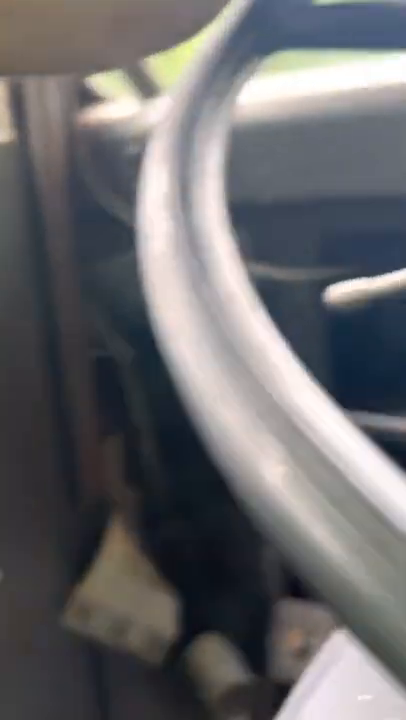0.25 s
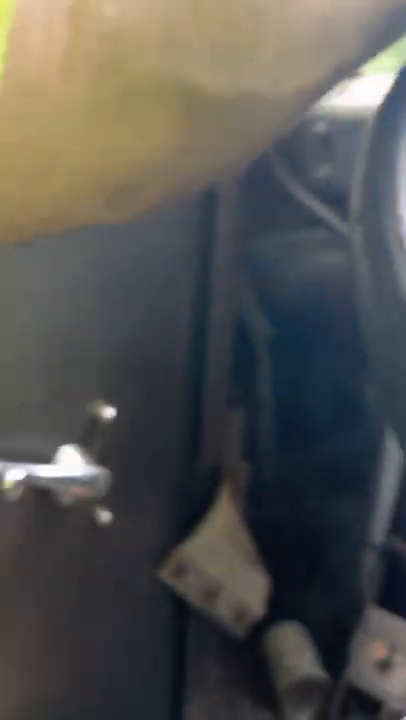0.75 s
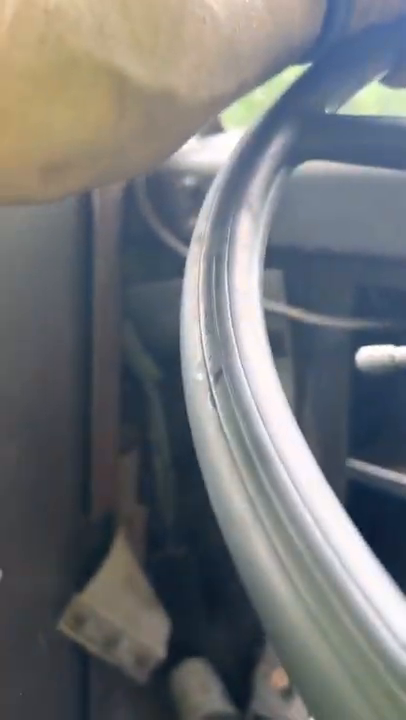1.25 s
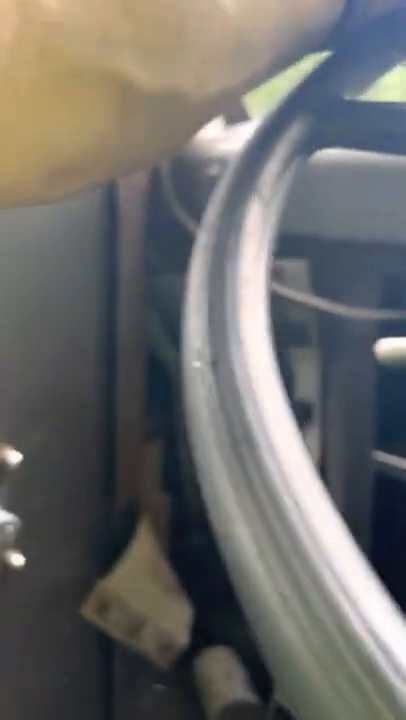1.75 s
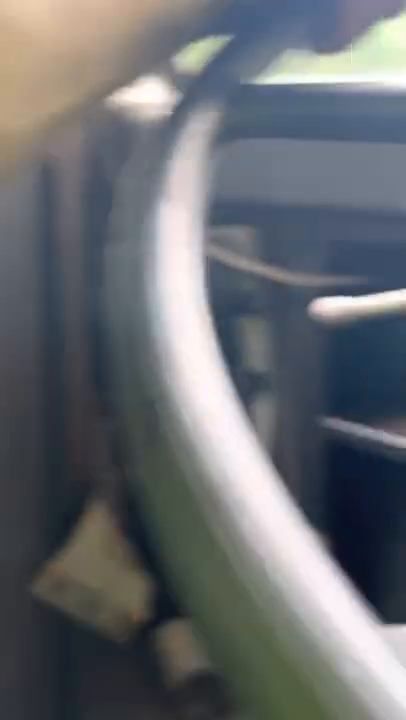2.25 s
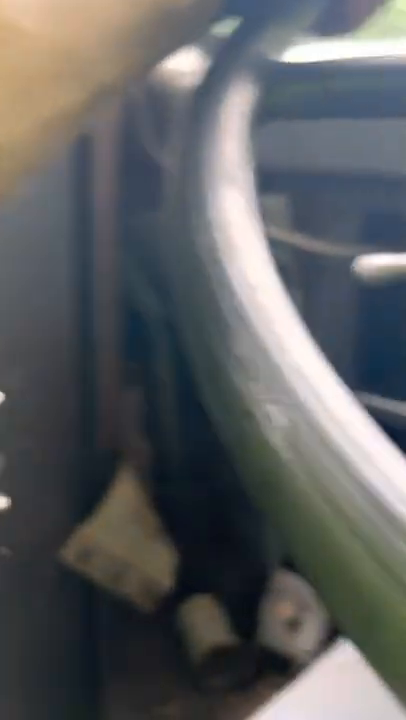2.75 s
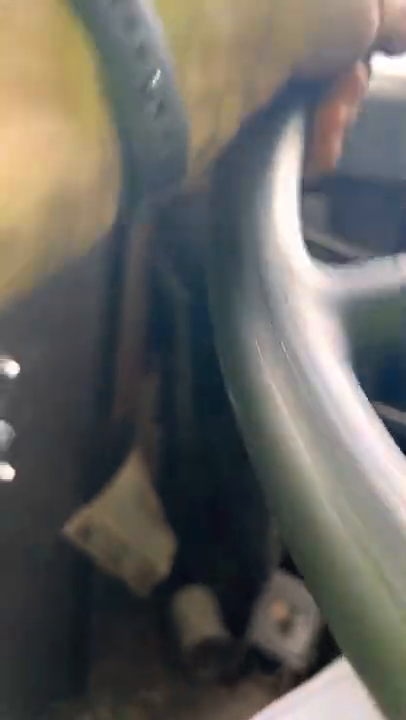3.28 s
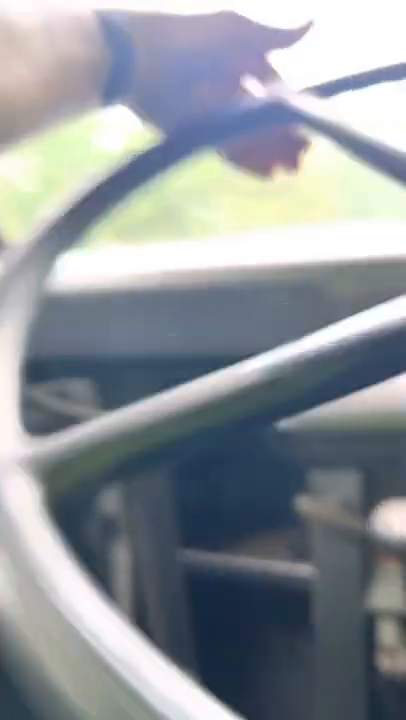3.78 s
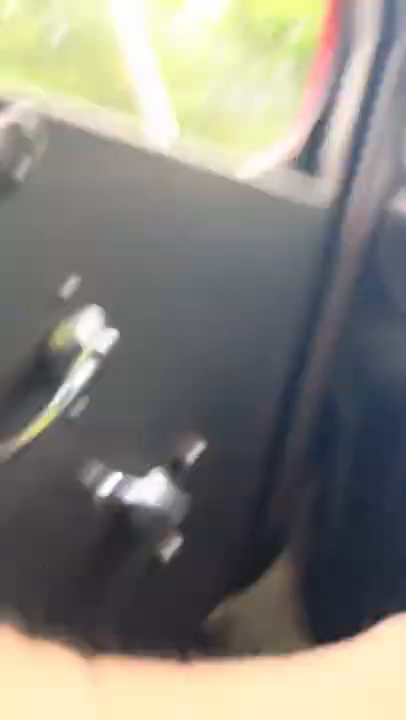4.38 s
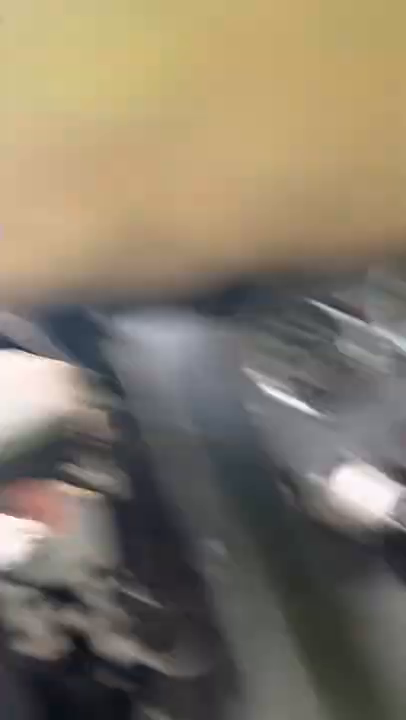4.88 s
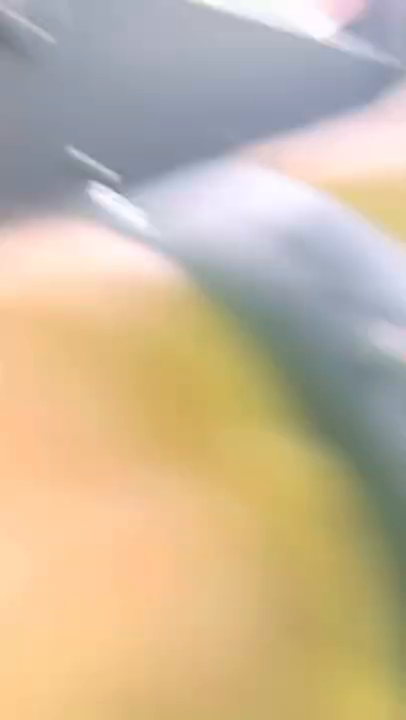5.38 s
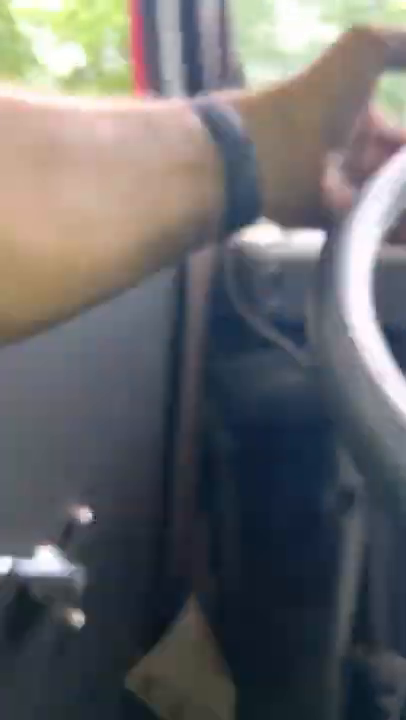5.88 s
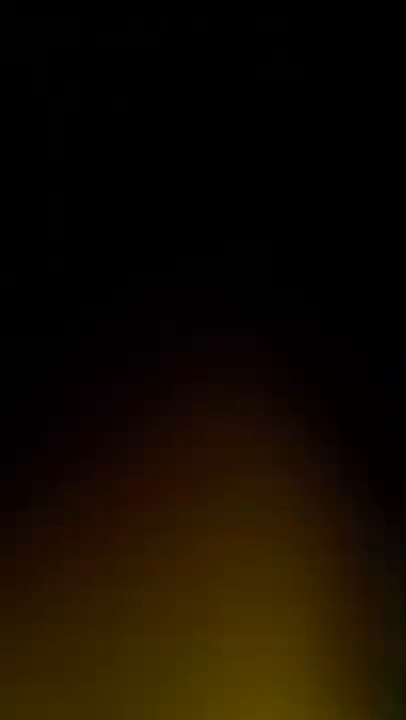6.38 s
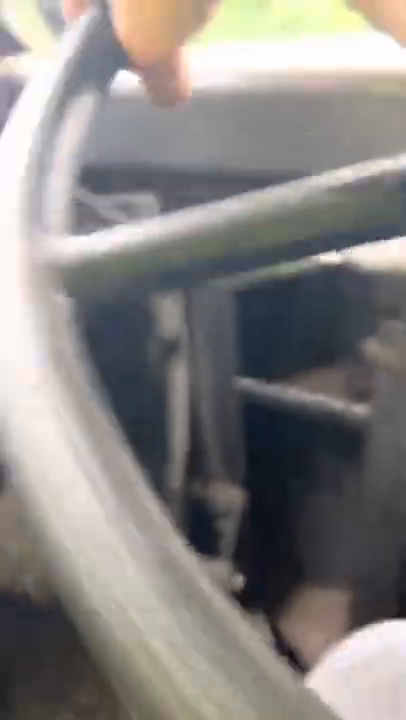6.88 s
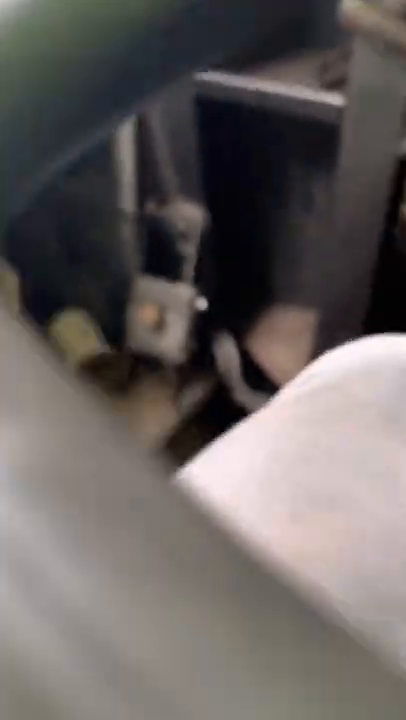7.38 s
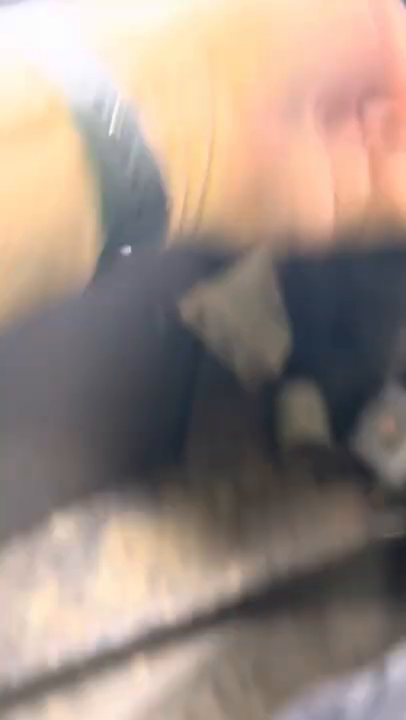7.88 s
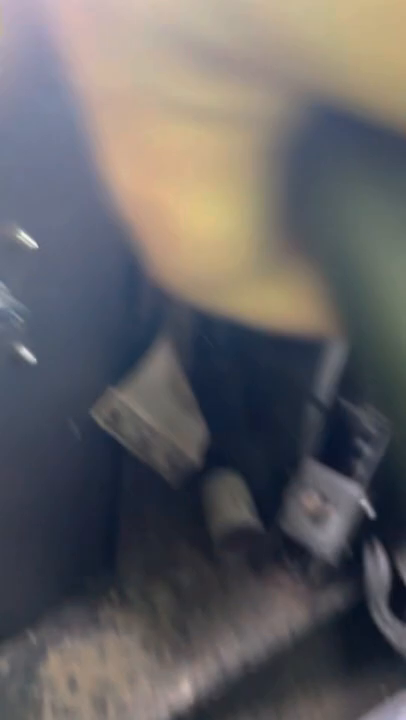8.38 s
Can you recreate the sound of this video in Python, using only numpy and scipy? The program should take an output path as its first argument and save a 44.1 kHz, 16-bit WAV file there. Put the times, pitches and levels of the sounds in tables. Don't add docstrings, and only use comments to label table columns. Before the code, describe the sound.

Muffled six-cylinder engine drone in a truck cab sags, idles along, thumps against the microphone, then climbs under load with buzzing trim and faint whistle.

```python
import sys
import numpy as np
from scipy import signal
from scipy.fft import rfft, irfft
from scipy.io import wavfile
from scipy.ndimage import uniform_filter1d, map_coordinates

SR = 44100
rng = np.random.default_rng(int(sys.argv[2]) if len(sys.argv) > 2 else 0)


def invert_db(x):
    u = np.asarray(x, float) / 20
    return 10 ** u


def to_wav(sig):
    pcm = np.clip(np.atleast_2d(sig), -1, 1) * 32767
    pcm = np.round(pcm).astype(np.int16)
    wavfile.write(sys.argv[1], SR, pcm.T)


N = 381024
T = np.arange(N) / SR
HZ = np.arange(N // 2 + 1) * SR / N

# time_s, half_firing_rate_hz
ENGINE_SPEED = [(0, 43.2), (.4, 40.99), (.85, 38), (1.3, 34.2), (1.8, 34.8), (2.03, 31.9), (3.4, 31.13),
                (4.05, 31.9), (4.75, 34.92), (5.3, 40.1), (5.6, 42.2), (5.96, 45.7), (6.42, 48.4),
                (6.85, 49.1), (7.08, 48.5), (7.3, 49.6), (7.65, 47.4), (7.96, 48.5), (8.1, 46.2),
                (8.4, 47.3), (8.64, 46.9)]
# time_s, load_db, gas_flow_db, injection_knock_db
EFFORT = [(0, -13, -7.5, -4.5), (.85, -16.5, -10, -4.5), (1.15, -27.5, -9, -6.5), (1.33, -18, -11.5, -0.5),
          (1.5, -12.5, -5.5, 0.5), (2.2, -13, -2.5, 0), (3.2, -15.5, -2, -0.5), (3.8, -12.5, -2.5, 4),
          (4.21, -9, 1.5, -2), (4.42, -6, 1.5, -3), (4.55, 1, 7, 1), (5.0, 0.5, 1.5, 2),
          (5.4, -0.5, 9, -4.5), (5.96, 2.5, 9, -1), (6.3, 1, 6, 1.5), (6.5, 0, 3, 1), (7.6, -3, 2, -0.5),
          (8.64, -2.5, 1.5, 0.5)]
START_TURN = -3.7
FIRING_DB = -10
ORDER_WANDER_DB = (.6, .5, 1.5)
# time_s, third_multiple_db, double_firing_db, triple_firing_db
STANDING_WAVES = [(0, -40, -26, -44), (.65, -33, -27.5, -44), (.9, -26.5, -41, -44), (1.1, -28, -43, -46),
                  (1.3, -23, -40, -44), (1.75, -18, -32, -38), (2.1, -20, -25, -39),
                  (2.35, -19.5, -27, -40), (2.6, -20.5, -22, -33.5), (3.05, -20, -25, -33),
                  (3.35, -21, -20.5, -31.5), (4, -19.5, -21, -34), (4.25, -17, -31, -39),
                  (4.6, -13.5, -31, -34), (4.9, -22, -43, -40), (5.12, -19, -40, -37), (5.4, -24, -31, -36),
                  (5.7, -34, -28, -28), (5.95, -25, -28, -32), (6.08, -40, -20.5, -36),
                  (6.28, -41, -20, -39), (6.42, -40, -26, -37), (7.3, -38, -28, -41), (7.65, -43, -22, -45),
                  (7.93, -36, -27, -39), (8.12, -42, -21.5, -42), (8.4, -42, -21.5, -42),
                  (8.64, -40, -24.5, -43)]
# multiple_of_cycle_rate, lift_db
GROWL_ORDERS = [(3, -0.5), (7, 5.5), (10, 0.5), (11, 0.5), (15, 2), (16, -5.5), (17, -1), (20, 3),
                (21, 1.5), (22, 2.5), (24, 1.5), (36, 1), (48, 2.5), (60, 1)]
# pitch_hz, share_of_power (0-1)
GROWL_SHARE = [(40, .7), (400, .65), (800, .68), (1300, .72), (2000, .7), (2800, .55), (3300, .1)]
# pitch_hz, density_db (per Hz)
CAB_COLOUR = [(25, -38.5), (48, 4), (110, 0), (300, -5.5), (421, -7), (700, -9.5), (1100, -13.5),
              (1830, -20), (3240, -31.5), (5000, -36), (8690, -45), (10200, -53.5), (11500, -55.5),
              (12300, -57), (13200, -100)]
# pitch_hz, density_db (per Hz)
SIDE_COLOUR = [(35, -52.5), (123, -7), (241, -17), (500, -13.5), (812, 0), (1300, -17), (1950, -23.5),
               (3900, -28.5), (5500, -30), (6100, -70), (7300, -61), (8200, -44.5), (10800, -44.5),
               (12300, -39), (13800, -46), (15500, -47), (16500, -83)]
# pitch_hz, width_hz, lift_db (negative dips)
PANELS = [(252, 31, 3.5), (330, 47, 4), (363, 23, 2.5), (603, 51, 5), (1018, 65, 3.5), (1235, 14, 6.5),
          (1814, 45, 4), (670, 55, -3.5), (890, 11, 0.5), (1580, 45, 2.5), (1960, 88, -2), (2200, 51, 2.5),
          (5050, 250, -11), (790, 53, -1.5)]
# offset_db, share_of_gas_flow, share_of_knock, pull_db (per Hz/s of pulling up)
ROAR_LAYERS = [
    (0.5, .3, .01, 0),
    (-1, 0.41, .01, 0.25),
    (0.08, 0.85, .01, 0.02),
    (-0.1, 0.57, 1.17, 0.0649),
    (1.5, 0.58, 0.34, 0.18),
]
# pitch_hz, share
IN_PHASE_LEAN = [(60, 0.041), (130, -0.048), (195, -0.037), (300, -0.15), (600, -0.15), (1200, -0.22),
                 (2500, 0.069), (5900, .001)]
# pitch_hz, share
QUADRATURE_LEAN = [(190, .01), (260, 0.12), (500, 0.35), (1000, .3), (2000, 0.14), (4500, .4), (5500, .12),
                   (5900, .001)]
# time_s, pitch_hz, front_level_db
TURBO = [(0, 4275, -70), (1.2, 4140, -78), (1.45, 4200, -56), (2.6, 4356, -57), (3.1, 4410, -53),
         (3.65, 4680, -58), (3.76, 4605, -41), (3.86, 4670, -53), (4.2, 4880, -58.5), (4.6, 5200, -53),
         (5.05, 5480, -46), (5.3, 5500, -51), (5.53, 5550, -44), (5.85, 5400, -45), (6.4, 5250, -51),
         (7, 4820, -61), (7.4, 4600, -54.5), (7.9, 4760, -54), (8.64, 4890, -53)]
WHISTLE_SIDE_DB, WHISTLE_SIDE_SHARE = -20, 0.63
# start_s, end_s, level_db
BROADSIDE = [
    (0, .6, -41),
    (5.35, 6.3, -35),
    (7.45, 8.03, -39),
    (8.03, 8.9, -38.5),
]
# start_s, end_s, multiple_of_cycle_rate, level_db
SWELLS = [
    (1.2, 2.2, 10, -21),
    (5.5, 6.93, 20, -35),
    (1.55, 1.81, 12, -30),
    (6.55, 7, 9, -33),
]
# start_s, end_s, multiple_of_cycle_rate,
# level_db
MORE_SWELLS = [(0.02, 0.77, 24.1, -37), (0.77, 1.34, 47.8, -43), (0.77, 1.42, 15.0, -37), (0.81, 1.29, 59.7, -46),
               (0.81, 1.82, 31.8, -36), (1.14, 2.08, 78.0, -44), (1.23, 1.82, 67.8, -47), (1.27, 1.99, 15.0, -33),
               (1.27, 1.99, 50.8, -41), (1.98, 2.88, 56.9, -42), (1.98, 3.69, 15.1, -33), (2.02, 2.74, 23.9, -35),
               (2.02, 2.78, 129.8, -53), (2.16, 3.21, 35.7, -40), (2.31, 2.93, 59.8, -43), (2.35, 3.07, 67.6, -47),
               (2.35, 3.31, 104.3, -44), (2.5, 3.26, 57.4, -43), (2.73, 3.55, 122.0, -50), (2.92, 3.88, 74.1, -44),
               (3.02, 3.74, 36.0, -38), (3.26, 4.12, 104.2, -44), (3.26, 4.26, 60.1, -41),
               (3.36, 3.98, 115.9, -44), (3.36, 4.03, 48.0, -43), (3.6, 4.31, 24.1, -34), (3.64, 4.31, 35.1, -38),
               (4.29, 4.88, 15.1, -34), (4.29, 5.25, 21.0, -29), (5.0, 5.6, 44.9, -32), (5.45, 6.49, 39.1, -31),
               (5.73, 6.36, 36.1, -34), (5.95, 6.3, 67.9, -35), (6.18, 7.5, 22.0, -28), (6.22, 6.98, 38.0, -37),
               (6.25, 6.83, 62.0, -43), (6.15, 7.7, 15.0, -32), (6.77, 7.56, 56.6, -44), (7.17, 8.13, 22.1, -35),
               (7.4, 8.2, 15.1, -34), (7.61, 8.25, 38.4, -37), (8.05, 8.74, 39.1, -36), (8.11, 8.74, 62.2, -39)]
MORE_SWELLS_DB = -2.5
# start_s, end_s, low_hz, high_hz, level_db
NOISE_SWELLS = [(3.65, 4.03, 820, 1150, -33.5), (5.65, 6.302, 890, 1100, -33), (6.301, 6.58, 1700, 2960, -38.5),
                (6.551, 7.15, 1100, 1940, -38), (7.15, 7.75, 1000, 1800, -34.5), (7.2, 7.75, 1030, 1110, -40.5),
                (7.2, 7.7, 1520, 1600, -46), (8.2, 8.8, 955, 990, -42), (5.45, 5.85, 320, 440, -32),
                (7.8, 8.64, 430, 580, -37.5), (7.08, 7.3, 2200, 3300, -47), (4.5, 5.1, 1100, 2560, -44.5),
                (3.7, 4.26, 1500, 3000, -47), (6.6, 7.5, 200, 290, -35), (1.47, 2.06, 200, 386, -26),
                (0, 1.2, 4100, 11000, -64.5), (5.02, 5.6, 400, 900, -31.5), (6.1, 6.6, 300, 480, -30),
                (0, 1.47, 2150, 3800, -56), (1.9, 2.25, 220, 330, -30), (0, 1.6, 312, 392, -37.5),
                (7.2, 7.9, 480, 670, -35), (6.55, 7.1, 5500, 12000, -59.5), (4.9, 5.3, 200, 520, -33),
                (.3, 1.1, 5200, 8500, -60), (4.6, 5.26, 450, 1100, -35.5), (4.5, 6.9, 4800, 5300, -54),
                (5.7, 6.35, 4600, 5200, -52), (0, .35, 325, 480, -37), (7.3, 7.75, 570, 640, -38),
                (7.25, 7.9, 1700, 1950, -45), (4.9, 6.6, 595, 625, -40), (6.4, 8.9, 595, 620, -43),
                (6.4, 8.3, 960, 985, -51), (1.9, 4.2, 750, 1050, -45), (1.2, 4.2, 11000, 11700, -78)]
# start_s, end_s, low_hz, high_hz, share_taken (0-1)
SHADES = [
    (7.22, 7.7, 2000, 3600, .38),
    (7.38, 7.65, 720, 860, .7),
    (0, .7, 850, 1000, .5),
    (4.72, 5.2, 135, 225, .35),
    (6.55, 6.8, 2500, 3200, .3),
]
# start_s, end_s, first_hz, last_hz, level_db
CLUTCH = [
    (1.6, 2.12, 134, 126, -26),
    (1.62, 2.05, 232, 220, -27),
    (1.55, 2.02, 428, 400, -33),
    (.8, 1.75, 378, 366, -39),
    (1.1, 1.65, 240, 235, -32),
    (1.6, 1.95, 250, 245, -30),
    (1.65, 1.95, 268, 258, -31),
]
# start_s, level_db, first_hz, last_hz, length_s
THUMPS = [
    (3.7275, -7, 180, 65, .034),
    (4.2612, .6, 185, 52, .028),
    (6.305, -18, 150, 80, .02),
]
# start_s, peak_db, pitch_hz, t60_s
TICKS = [(3.722, -17, 380, 0.03), (4.174, -26, 1950, .035), (4.182, -26, 1900, 0.047),
         (4.263, -34, 3000, 0.013), (4.182, -39.5, 10950, .004), (4.262, -10, 450, 0.02),
         (4.775, -39, 6700, 0.07), (6.3897, -14.5, 6800, 0.005), (6.39, -24, 5100, .006),
         (6.3893, -38, 12500, .004), (7.118, -33, 7500, 0.017), (7.8, -32, 2400, 0.023),
         (7.158, -34, 2900, .04), (8, -31, 2660, .02), (3.741, -32, 4600, 0.15),
         (4.266, -50.5, 13000, .004), (4.296, -45, 4890, .07), (4.235, -39, 4950, 0.1),
         (5.66, -34, 5400, .05), (5.885, -33, 5400, .05), (4.55, -40, 5050, .05), (5.798, -28, 5360, .05),
         (4.181, -40, 8000, .01), (6.39, -20, 2160, 0.012), (6.391, -17.5, 670, 0.035),
         (8.636, -35, 9500, 0.004), (4.183, -49, 13400, 0.0035), (4.27, -53, 14200, .004),
         (6.39, -24.5, 3700, 0.008), (6.39, -18.5, 1300, .016)]
# start_s, bass_drop_db, treble_drop_db, recovery_s
DUCKS = [
    (4.269, 18.5, 15.5, 0.22),
    (4.67, 15, 2.5, 0.21),
    (6.325, 1.5, 6, 0.11),
]
BASS, TREBLE = 1, 2


def columns(table):
    time_s, *values = np.transpose(table)
    return [np.interp(T, time_s, value) for value in values]


def shape(points):
    hz, value = np.transpose(points)
    return np.interp(np.log(HZ + 1), np.log(hz), value)


def unit(x):
    return x / np.sqrt(np.mean(x ** 2))


def walk(rate):
    k = int(SR / rate)
    held = np.repeat(rng.standard_normal(N // k + 1), k)
    return 1.49 * uniform_filter1d(uniform_filter1d(held, k), k)[:N]


def hump(start, end):
    span = slice(int(start * SR), min(int(end * SR), N))
    return span, np.sin(np.pi * (T[span] - start) / (end - start))


def duck(column):
    gain_db = 0
    for row in DUCKS:
        since = T - row[0]
        gain_db = gain_db - row[column] * np.clip(since / 0.0037, 0, 1) * np.exp(-np.abs(since) / row[3])
    return gain_db


def firing_orders(load_db):
    levels = [FIRING_DB + load_db]
    for level, wander_db in zip(columns(STANDING_WAVES), ORDER_WANDER_DB):
        levels.append(level + wander_db * walk(5))
    return [db + duck(BASS) for db in levels]


def boom(turn, levels):
    lead = np.interp(levels[0], [-24, -14], [-1.8, .6])
    out = 0
    for order, db, lead_share in zip((2, 3, 4, 6), levels, (0, .5, 1, .5)):
        gain = invert_db(db + 0.61 * walk(14))
        out = out + gain * np.cos(order * turn + lead_share * lead + 0.19 * walk(25))
    return np.sqrt(2) * out


def growl(turn):
    cycle = 1 + turn / (6 * np.pi)
    chance = rng.standard_normal((2, 200, 513))
    orders = signal.lfilter([1], [1, -.91], chance[0] + 1j * chance[1], axis=0)[40:]
    lift = np.ones(513) * (np.arange(513) < 310)
    lift[[0, 6, 9, 12, 18]] = 0
    for order, db in GROWL_ORDERS:
        lift[round(order)] *= invert_db(db)
    pattern = irfft(orders / np.abs(orders) ** .05 * lift, axis=1)
    pattern = np.c_[pattern, pattern[:, 0]]
    return unit(map_coordinates(pattern, [cycle, cycle % 1 * 1024], order=1))


def roar(turn, colour, levels, count):
    colour_db = shape(colour)
    for hz, width, lift_db in PANELS:
        colour_db = colour_db + lift_db / (1 + (2 * (HZ - hz) / width) ** 2)
    share = np.clip(shape(GROWL_SHARE), 0, 1) * (HZ < 3400)
    hiss = np.sqrt(1 - share) * rfft(rng.standard_normal(N))
    noise = (hiss + .42 * np.sqrt(share) * rfft(growl(turn))) * invert_db(colour_db)
    throb = 1 + 0.11 * np.cos(turn) + 0.11 * np.cos(2 * turn)
    shared = walk(12)[::32]
    coarse = np.array(levels)[:, ::32]
    out = 0
    for hz in 31.25 * 2 ** np.arange(0, 9.1, 1 / count):
        first, last = (int(hz * 2 ** (edge / count) * N / SR) for edge in (-1, 1))
        window = np.cos(np.pi * count * np.log2(HZ[first:last] / hz) / 2) ** 2
        band = np.zeros_like(noise)
        band[first:last] = noise[first:last] * window
        place = np.interp(np.log(hz), np.log([55, 150, 300, 800, 2200, 7000]), range(6))
        low = min(int(place), 4)
        db = coarse[low] + (place - low) * (coarse[low + 1] - coarse[low])
        flicker_db = 0.47 * min(hz / 600, 1) * shared + 0.98 * walk(11)[::32]
        out = out + np.interp(T, T[::32], invert_db(db + flicker_db)) * irfft(band, N)
    return throb * out / np.sqrt(np.mean(irfft(noise, N) ** 2))


def turbo(turn):
    hz, front_db = columns(TURBO)
    levels = front_db, WHISTLE_SIDE_DB + WHISTLE_SIDE_SHARE * front_db
    spin = 2 * np.pi * np.cumsum(hz) / SR
    lowpass = signal.butter(2, 145, fs=SR, output="sos")
    out = []
    for db in levels:
        breath = signal.sosfilt(lowpass, rng.standard_normal((2, N)))
        out.append(invert_db(db) * unit(breath[0] * np.cos(spin) + breath[1] * np.sin(spin)))
    puffs = invert_db(duck(TREBLE) + 0.99 * walk(13) + 2.8 * walk(45))
    return np.array(out) * puffs * (1 + 0.12 * np.cos(turn))


def broadside(turn):
    out = np.zeros(N)
    for start, end, db in BROADSIDE:
        span, rise = hump(start, end)
        gain = invert_db(db + 3 + 1.5 * walk(12)[span])
        out[span] += gain * np.abs(rise) ** .4 * np.sin(4 * turn[span])
    return out


def resonances(turn):
    out, waver = np.zeros(N), 3 * walk(20)
    hums = [(start, end, order, db + MORE_SWELLS_DB) for start, end, order, db in MORE_SWELLS]
    for start, end, order, db in SWELLS + hums:
        span, rise = hump(start, end)
        whole = round(3 * order) / 3
        phase = whole * turn[span] / 3 + 2 * np.pi * rng.random() + .15 * waver[span]
        out[span] += invert_db(db + 3 + waver[span]) * rise * np.cos(phase)
    for start, end, low_hz, high_hz, db in NOISE_SWELLS:
        span, rise = hump(start, end)
        band = signal.butter(4, [low_hz, high_hz], "bandpass", fs=SR, output="sos")
        buzz = unit(signal.sosfilt(band, rng.standard_normal(len(rise))))
        out[span] += invert_db(db + 1.8 * walk(25)[span]) * rise * buzz
    return out


def shade(sound):
    out = sound.copy()
    for start, end, low_hz, high_hz, share in SHADES:
        span, rise = hump(start, end)
        band = signal.butter(2, [low_hz, high_hz], "bandpass", fs=SR, output="sos")
        out[span] -= min(share, 1) * np.abs(rise) ** .5 * signal.sosfiltfilt(band, sound[span])
    return out


def clutch():
    out = np.zeros(N)
    for start, end, first_hz, last_hz, db in CLUTCH:
        span, rise = hump(start, end)
        hz = np.linspace(first_hz, last_hz, len(rise))
        gain = invert_db(db + 3 + 2.5 * walk(18)[span])
        out[span] += gain * rise ** .6 * np.sin(2 * np.pi * np.cumsum(hz) / SR)
    return out


def bumps():
    out, t = np.zeros((2, N + SR)), T[:SR // 5]
    for start, db, first_hz, last_hz, length in THUMPS:
        hz = last_hz + (first_hz - last_hz) * np.exp(-(t / (0.7 * length)) ** 2)
        swell = (t / (0.31 * length)) * np.exp(1 - t / (0.25 * length))
        out[0, int(start * SR):][:len(t)] += invert_db(db) * swell * np.sin(2 * np.pi * np.cumsum(hz) / SR)
    for start, db, hz, t60 in TICKS:
        decay = np.clip(t / (0.034 * t60), 0, 1) * invert_db(-60 * t / t60)
        burst = rng.standard_normal((2, len(t))) * decay
        width = min(12 / t60, 0.25 * hz)
        band = signal.butter(3, [hz - width, hz + width], "bandpass", fs=SR, output="sos")
        ring = signal.sosfilt(band, burst)
        spread = [[1], [min((hz / 11000) ** 4, 1)]]
        out[:, int(start * SR):][:, :len(t)] += invert_db(db) * ring / np.abs(ring[0]).max() * spread
    return out[:, :N]


def scene():
    hz, = columns(ENGINE_SPEED)
    load_db, flow_db, knock_db = columns(EFFORT)
    pull = np.clip(uniform_filter1d(np.gradient(hz) * SR, SR // 3), 0, None)
    turn = START_TURN + 2 * np.pi * np.cumsum(hz) / SR
    levels = []
    for db, flow_share, knock_share, pull_db in ROAR_LAYERS:
        effort_db = flow_share * flow_db + knock_share * knock_db + pull_db * pull
        levels.append(db + effort_db + duck(TREBLE))
    levels[0] += duck(BASS) - duck(TREBLE)
    levels.insert(0, levels[1])
    cab = shade(resonances(turn) + invert_db(-24) * roar(turn, CAB_COLOUR, levels, count=2))
    mid = boom(turn, firing_orders(load_db)) + clutch() + cab
    side_levels = levels[:5] + [0.65 * levels[5]]
    side = invert_db(-32.5) * roar(turn, SIDE_COLOUR, side_levels, count=1)
    side += irfft(rfft(mid) * (shape(IN_PHASE_LEAN) - 1j * shape(QUADRATURE_LEAN)), N)
    mid, side = np.array([mid, side + broadside(turn)]) + turbo(turn) + bumps()
    return np.array([mid + side, mid - side]) * np.clip(T / .001, 0, 1)


def roll_off(x):
    return signal.sosfilt(signal.butter(12, 15800, fs=SR, output="sos"), x)


def record(dry):
    mix = np.clip(np.tanh(0.83 * dry) / 0.78, -.95, .95)
    return roll_off(mix)


dry = scene()
out = record(dry)
to_wav(out)
```